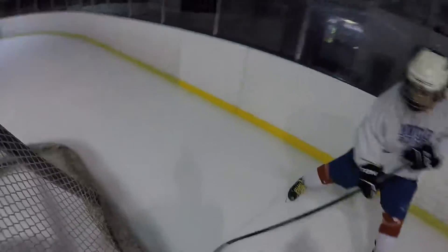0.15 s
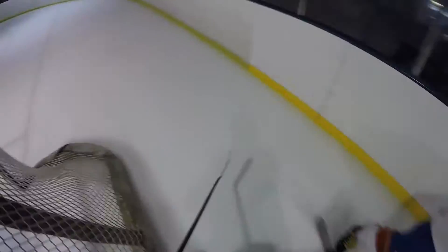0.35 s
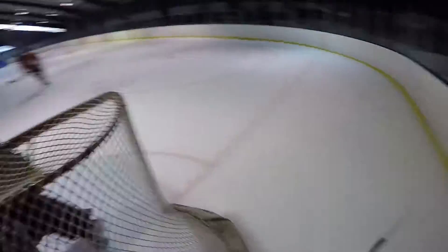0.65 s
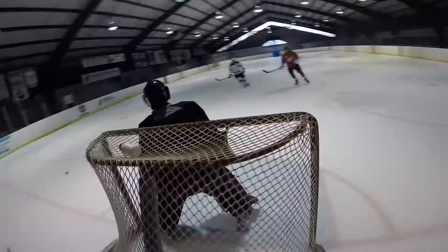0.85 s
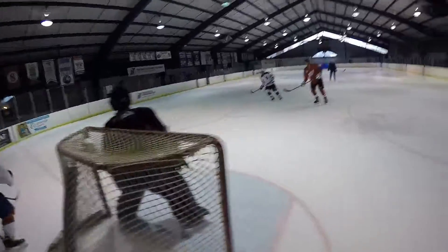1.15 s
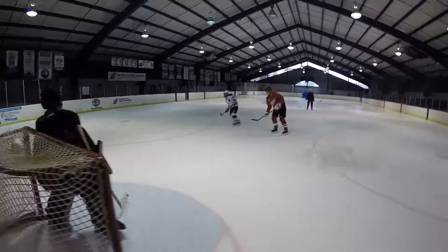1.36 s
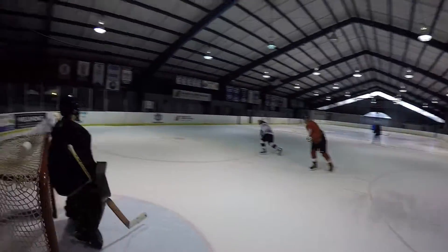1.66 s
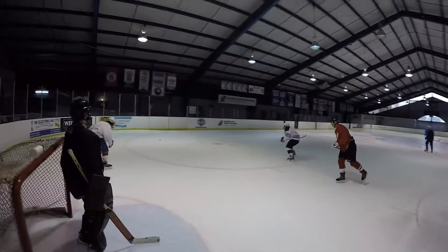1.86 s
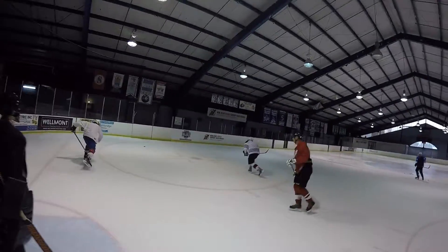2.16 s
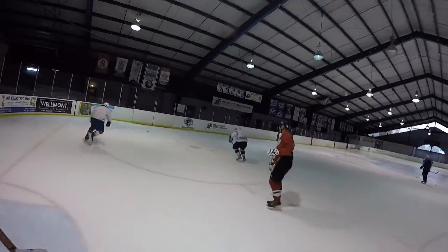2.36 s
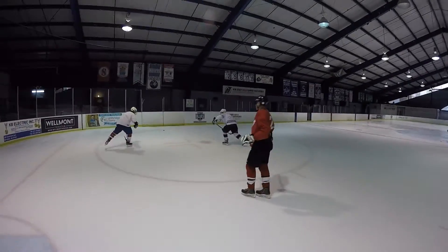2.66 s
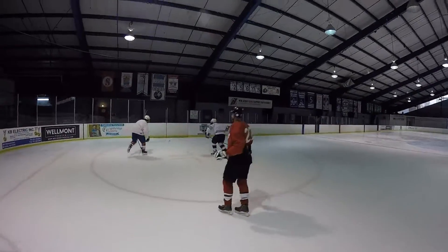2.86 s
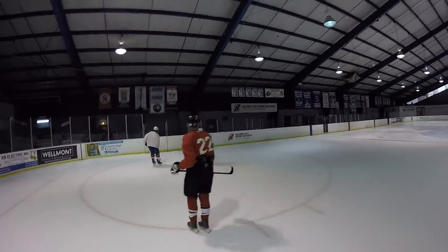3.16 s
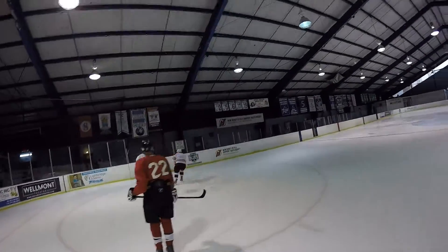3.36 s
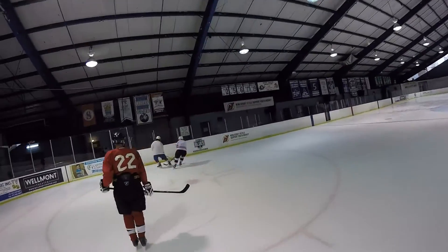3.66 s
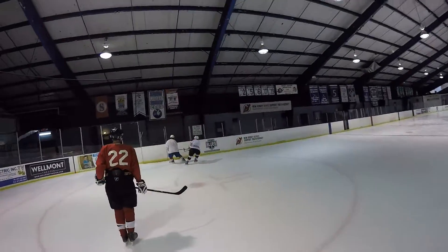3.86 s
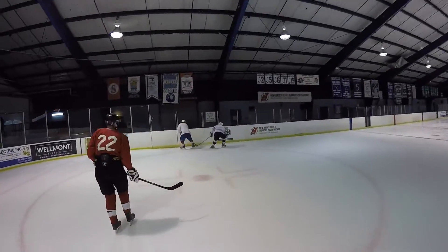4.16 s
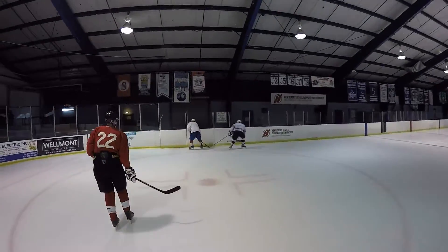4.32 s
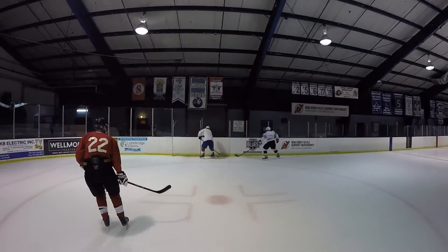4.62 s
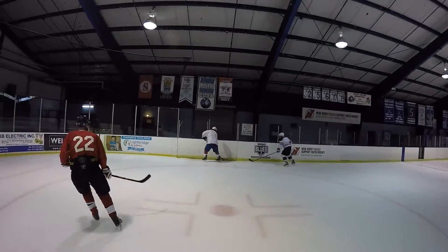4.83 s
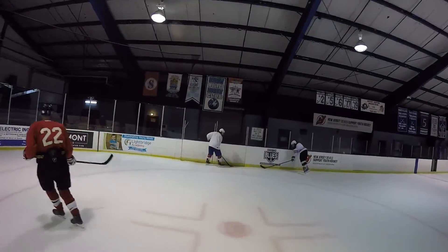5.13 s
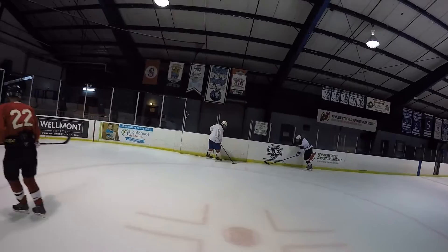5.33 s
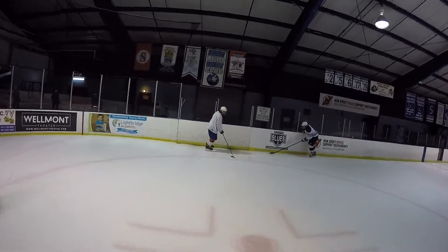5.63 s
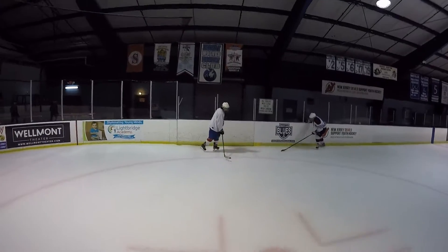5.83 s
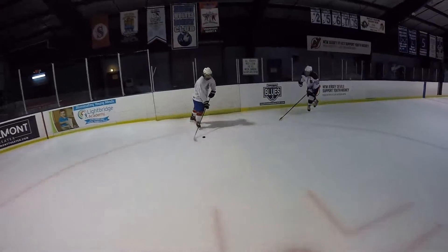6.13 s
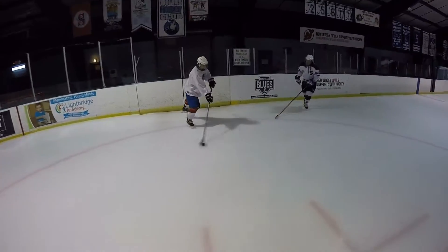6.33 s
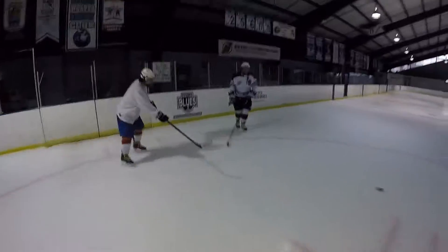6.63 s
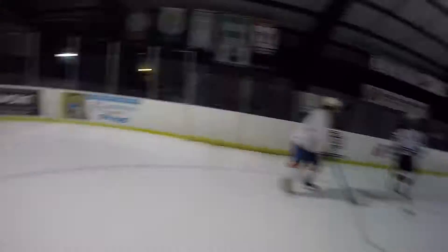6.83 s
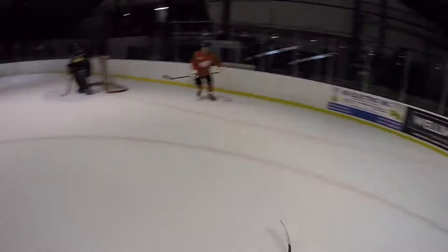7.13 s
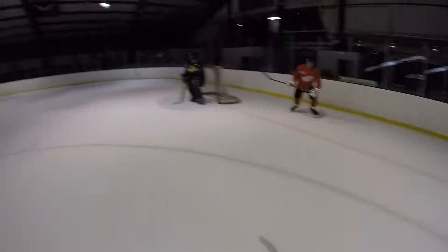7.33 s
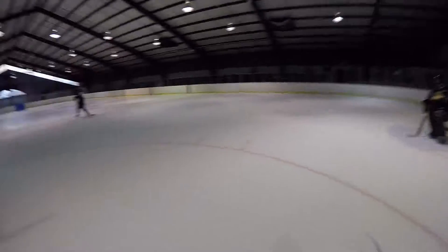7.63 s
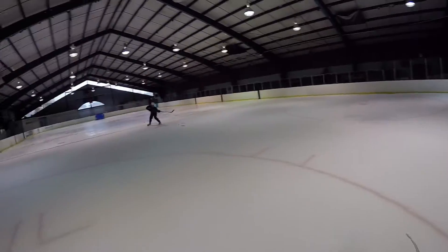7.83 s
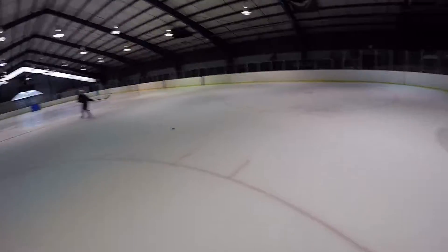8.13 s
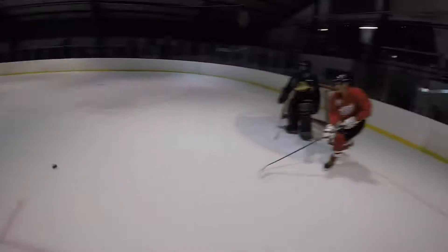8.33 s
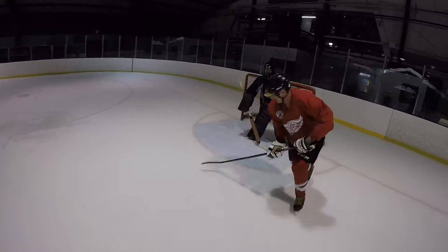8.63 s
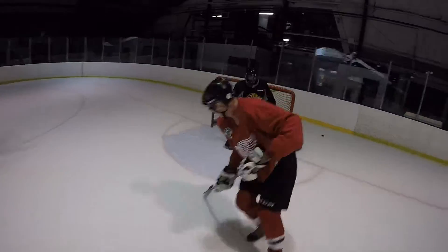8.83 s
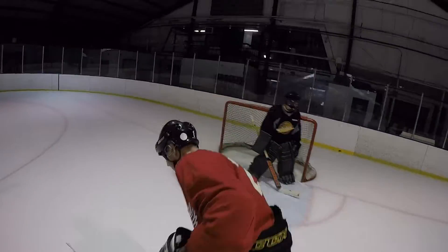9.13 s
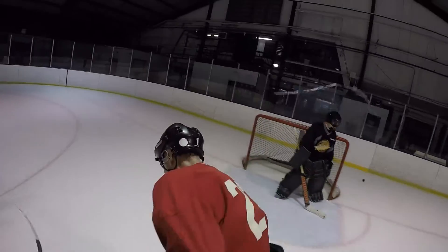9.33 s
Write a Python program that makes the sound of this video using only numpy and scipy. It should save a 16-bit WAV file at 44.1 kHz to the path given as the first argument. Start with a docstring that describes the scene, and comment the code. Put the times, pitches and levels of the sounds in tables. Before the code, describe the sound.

Close, gritty skate strokes hiss and scrape almost continuously, over low air buffeting and thumping camera shake. Stick and puck cracks come at the start, lightly in the middle, then in a hard burst near eight seconds, each echoing through the big indoor hall. Boards thud before five seconds; at nine a shot strikes the goal with a rough, low metallic shudder. Faint hiss and dull ticking lie beneath.

```python
"""Ice hockey in an indoor rink, heard at a camera on a skater's helmet: blades carve the ice and throw snow throughout.
A hard clack of stick and puck comes at once, skates step down from 1 to 3 s, and the boards thud near 4 s.
Air buffets the camera hardest at the start and at 7 s; hard clacks follow near 8 s, and at 9 s a shot rings the goal.
Shaped noise makes ice and air, struck resonances make the blows, and the hall answers every blow.
Faint hiss and regular low ticks lie beneath."""
import sys
import numpy as np
from scipy import signal
from scipy.fft import rfft, irfft, next_fast_len
from scipy.io import wavfile
from scipy.ndimage import uniform_filter1d, map_coordinates

SR = 44100
rng = np.random.default_rng(int(sys.argv[2]) if len(sys.argv) > 2 else 0)


def bounce(signal):
    """Save signal as a 16-bit WAV file at the path given by the first command-line argument."""
    frames = np.transpose(np.atleast_2d(signal))
    limited = np.clip(frames, -1, 1)
    pcm = np.round(limited * 32767).astype(np.int16)
    wavfile.write(sys.argv[1], SR, pcm)


N = 418068

# Air flow past the helmet as its wearer speeds up and turns:
# (time [s], buffet level [dB], mount shake level [dB])
AIR_FLOW = [(0.0, -28, -33), (0.22, -24.5, -19.5), (0.62, -36, -37.5), (1.02, -25.5, -30),
            (1.6, -38, -31.5), (1.95, -27.5, -37), (2.42, -41.5, -42), (3.05, -31.5, -42),
            (3.9, -34.5, -42.5), (5.25, -35.5, -39), (5.8, -43.5, -51), (6.25, -31.5, -41),
            (6.64, -37.5, -42.5), (6.97, -18, -20.5), (7.22, -23, -31.5), (7.55, -26, -35.5),
            (7.9, -39, -34.5), (8.25, -30, -48), (8.65, -38.5, -40.5), (9.0, -32, -31),
            (9.48, -28.5, -39.5)]
# Resonances of a stick blade: (centre [Hz], width [Hz], relative level [dB])
BLADE_MODES = [(1615, 126, 3), (2085, 520, -1), (2350, 99, 5)]


def amp(db):
    """Level is logarithmic: 20 dB is a factor of ten in amplitude."""
    return 10 ** (np.asarray(db) / 20)


def unit(x):
    """Normalization of the mean power: scale to rms 1."""
    return x / np.sqrt(np.mean(x ** 2) + 1e-20)


def along(points, hz):
    """Pitch is logarithmic: interpolate (frequency [Hz], value) points on a log axis."""
    f, v = np.transpose(points)
    return np.interp(np.log(hz + 1), np.log(f + 1), v)


def curves(rows):
    """Linear interpolation in time: one value per sample for each column after the time."""
    s, *columns = np.transpose(rows)
    return [np.interp(np.arange(N) / SR, s, column) for column in columns]


def wobble(rate):
    """Band-limited fluctuation: a smooth curve through random knots, rate of them per second."""
    knots = rng.standard_normal(int(N * rate / SR) + 4)
    return map_coordinates(knots, [np.arange(N) * rate / SR])


def filtered(x, response):
    """Linear filtering: multiply the spectrum of x by a response of frequency."""
    m = next_fast_len(len(x) + 4096)  # the padding leaves room for ringing
    return irfft(rfft(x, m) * response(np.fft.rfftfreq(m, 1 / SR)), m)[:len(x)]


def coloured(x, spectrum):
    """Spectral shaping: x weighted by (frequency [Hz], level [dB]) points, at rms 1."""
    return unit(filtered(x, lambda hz: amp(along(spectrum, hz))))


def resonance(f, centre, width):
    """Damped harmonic oscillator: the response of one mode, with gain 1 at its centre."""
    return 1j * f * width / (centre * centre - f * f + 1j * f * width)


def struck(x, modes, detune=0.027, scatter_db=0.5):
    """Modal superposition: x excites resonances that differ a little with the place of the blow."""
    chance = rng.standard_normal((len(modes), 2))
    varied = []
    for (centre, width, db), (a, b) in zip(modes, chance):
        varied.append((centre * np.exp(detune * a), width, amp(db + scatter_db * b)))

    def response(f):
        """Modes of alternating sign add up, as at a point where neighbours move in opposition."""
        return sum((-1) ** k * gain * resonance(f, centre, width)
                   for k, (centre, width, gain) in enumerate(varied))

    return unit(filtered(x, response))


def softened(x, hz):
    """Low-pass limit of excitation: a contact of finite length cannot excite the highest treble."""
    return signal.sosfilt(signal.butter(N=4, Wn=min(hz, .45 * SR), fs=SR, output="sos"), x)


def add(track, s, sound):
    """Linear superposition: mix a sound into the track at s seconds."""
    place = track[max(0, round(s * SR)):][:len(sound)]
    place += sound[:len(place)]


def chips(rate, spread_db, hiss):
    """Brittle fracture as a Poisson process: random snaps of unequal size on a bed of hiss."""
    count = rng.poisson(rate / SR, N)
    size = amp(spread_db * np.minimum(rng.exponential(size=N), 3))
    snaps = unit(count * size * rng.choice([-1, 1], N))
    return unit(snaps + hiss * rng.standard_normal(N))


def patchy(x, depth_db):
    """Time-varying filtering: the colour keeps shifting as the blade's edge and angle change."""
    z = signal.stft(x, nperseg=512)[2]
    across_bands = uniform_filter1d(rng.standard_normal(z.shape), size=5, axis=0)
    field = uniform_filter1d(across_bands, size=10, axis=1)
    return signal.istft(z * amp(depth_db * unit(field)), nperseg=512)[1][:N]


def skates(carving, spraying, scraping):
    """Friction noise of fracture: edges shave the ice and chatter, deep cuts growl, loose snow fizzes."""
    # Spectra of shaved ice, loose snow and deep cuts: (frequency [Hz], relative level [dB])
    carve_spectrum = [(700, -42), (1380, -7.5), (1480, -7.5), (1620, 2.5), (1900, 2), (2100, -2), (2400, 1),
                      (2900, -2.5), (3500, -9), (3950, -5), (4400, -18.5), (5500, -26.5), (8000, -35),
                      (15000, -64)]
    spray_spectrum = [(2500, -1.5), (4800, 14), (6300, 3), (7700, 2.5), (8600, -2), (9600, 2.5),
                      (11200, -9.5), (13000, -7), (15500, -16)]
    scrape_spectrum = [(100, 10), (200, -5.5), (350, -5.5), (600, -4), (760, -1.5), (1020, 1.5),
                       (1300, 4.5), (1700, -31), (3000, -44.5)]
    chatter_db = 0.58 * wobble(25) + 0.62 * wobble(110)
    carve = coloured(patchy(chips(rate=2500, spread_db=4.0, hiss=1.64), depth_db=1.37), carve_spectrum)
    spray = coloured(patchy(chips(rate=4000, spread_db=3.0, hiss=0.91), depth_db=3.4), spray_spectrum)
    scrape = coloured(patchy(chips(rate=900, spread_db=2.5, hiss=1.6), depth_db=0.5), scrape_spectrum)
    shaved = amp(-3.5) * carving * carve
    snow = amp(-4.0) * spraying * spray
    return amp(chatter_db) * (shaved + snow) + scraping * scrape


def skating():
    """Incoherent sources add in power: strokes lie on top of a glide that grows with the air flow."""
    # Skate strokes: (time of full pressure [s], rise [s], hold [s], fade [dB/s], carving level [dB],
    # snow spray relative to carving [dB], deep scrape relative to carving [dB])
    stroke_rows = [(0.02, 0.13, 0.016, 40, -36, -2.5, -17), (0.19, 0.25, 0.18, 54, -23.5, -6, -27),
                   (0.861, 0.42, 0.049, 16, -34.5, -23, -12), (1.17, 0.078, 0.046, 8.5, -35, -16, -9.5),
                   (1.43, .05, 0.12, 8.1, -39, -28, -9), (2.58, 0.16, .05, 11.6, -37.5, -14.5, -17.5),
                   (3.08, 0.045, .03, 63, -46, -8, -5), (3.761, 0.22, 0.055, 18, -37, -9, -11.5),
                   (3.95, 0.24, 0.04, 10.5, -26, -16, -17.5), (4.21, .06, .04, 10.7, -28.5, -19.5, -15),
                   (4.52, 0.24, 0.033, 7.3, -35, -8, -14), (4.82, 0.26, 0.036, 25, -29.5, -14.5, -28),
                   (6.12, 0.28, 0.019, 160, -38.5, -14.5, -19), (6.441, 0.23, 0.041, 20, -34, -16, -9),
                   (6.79, 0.27, 0.027, 24, -28, -15.5, -8.5), (7.499, 0.46, 0.035, 130, -35, -16.5, -5.5),
                   (7.79, 0.41, .15, 9.5, -27, -18, -15.5), (8.27, .12, .03, 11, -36.5, -12, -30),
                   (8.68, 0.4, 0.019, 35, -58.5, 11.5, -23), (8.96, 0.17, 0.032, 17, -44.5, 3, -16),
                   (9.07, 0.1, 0.084, 27, -27.5, -24, -26), (9.42, 0.33, .05, 14, -32.5, -30, -4)]
    spray_fades = 2.56  # snow settles this many times faster than the carving fades
    # the wearer's own glide at the mean of the flow curve, in dB, and its dB per dB of flow
    glide_db, glide_spray_db, glide_scrape_db, glide_grows = -43, -59.5, -51.5, 0.59
    _, flow_db = curves(AIR_FLOW)  # the mount shake stands for the flow
    glide = amp(glide_grows * (flow_db - flow_db.mean()))
    carve, spray, scrape = [(amp(db) * glide) ** 2 for db in (glide_db, glide_spray_db, glide_scrape_db)]
    for s, rise, hold, fade, db, spray_db, scrape_db in stroke_rows:
        pressure = amp(db) * stroke(s, rise, hold, fade)
        carve += pressure ** 2
        scrape += (amp(scrape_db) * pressure) ** 2
        spray += (amp(db + spray_db) * stroke(s, rise, hold, spray_fades * fade)) ** 2
    return np.sqrt([carve, spray, scrape])


def stroke(s, rise, hold, fade):
    """Exponential decay after loading: edge pressure builds and holds, then fades by fade dB a second."""
    t = np.arange(N) / SR - s
    build = np.clip(1 + t / max(rise, .01), 0, 1) ** 2
    return build * amp(-abs(fade) * np.maximum(t - hold, 0))


def clacks():
    """Impact and rebound: stick and puck meet twice in quick succession; a skate lands only once."""
    # Sticks and puck meeting: (time [s], relative level [dB], rebound delay [s],
    # shaft knock [dB], snap [dB], strongest ring [Hz])
    contacts = [(0.1001, -14, .007, -16, -6.5, 1750), (0.2855, -0.5, 0.0047, -29, -6.5, 2083),
                (0.951, -16.5, .003, -17, -15, 2030), (0.9575, -13, 0.0038, -25, -31, 1560),
                (0.9982, -21, 0.0081, -32, -15, 2520), (1.708, -23.5, .003, -35, -14, 1610),
                (2.7236, -27.5, 0.0022, -21, -7.5, 2560), (3.3316, -29.5, 0.0021, -16, -26.5, 1880),
                (3.557, -31, .009, -23, -5, 2470), (3.915, -14.5, 0.021, -22, -7, 2150),
                (4.1607, -16.5, 0.019, -16.5, -2, 1770), (4.7054, -14.5, .019, -24, -7.5, 2490),
                (5.9918, -35, 0.00194, -14, -6, 1580), (6.2251, -22, .002, -34, -15, 2140),
                (6.327, -18.5, 0.0038, -32, -10.5, 2560), (6.3749, -13.5, .015, -15, -2, 1630),
                (7.0906, -15, 0.00196, -20, -10.5, 2240), (7.2573, -23, 0.0076, -29, -13, 2460),
                (7.3437, -23, .003, -29, -20, 1650), (7.3762, -26, .003, -20, -36, 1540),
                (7.7573, -5, 0.0021, -21, -5, 1707), (7.7865, -2.5, 0.012, -21.5, -13.5, 1885),
                (7.8335, -14, 0.0078, -37, -7, 1710), (7.9329, -11, 0.0048, -31, -20, 2040),
                (8.0155, -11.5, 0.00197, -23.5, -24, 1790), (9.0227, -10.5, 0.0068, -11, -2, 1810),
                (9.3183, -21, 0.0038, -19, -22, 2320)]
    # Skate blades set down on the ice: (time [s], relative level [dB])
    landings = [(1.1398, -23), (1.3943, -21), (2.08, -31.5), (2.548, -33.5), (3.0629, -37)]
    rebound_db = -4.5  # against the first blow
    crack_db = -17  # offset from the snap setting: both grow with the hardness of the blow
    track = np.zeros(N)
    for s, db, rebound, knock_db, snap_db, hz in contacts:
        for delay, loss_db in [(0, 0), (rebound, rebound_db)]:
            blow = clack(knock_db, snap_db, snap_db + crack_db, hz, t60=0.035)
            add(track, s + delay, amp(db + loss_db) * blow)
    for s, db in landings:
        add(track, s, amp(db) * clack(knock_db=-19, snap_db=-8, crack_db=-13, hz=1590, t60=0.1))
    return filtered(track, lambda f: (1j * f / (330 + 1j * f)) ** 2)  # thin sticks radiate little bass


def clack(knock_db, snap_db, crack_db, hz, t60):
    """Impulsive modal excitation: a chattering contact rings blade and shaft and cracks the ice."""
    # Resonances of shaft and puck, and of the snap: (centre [Hz], width [Hz], relative level [dB])
    shaft_modes = [(517, 1100, -8), (640, 15, -25), (1080, 210, 10.5)]
    snap_modes = [(2827, 174, 3.5), (3220, 350, -3.5), (3980, 190, -1.5), (4860, 710, -20)]
    # Spectrum of the ice crack: (frequency [Hz], relative level [dB])
    crack_spectrum = [(1000, -1), (3500, -4.5), (5200, 5.5), (6500, 2), (8500, -7.5), (9800, -6),
                      (11500, -25), (15500, -21)]
    t = np.arange(SR // 10) / SR
    contact = rng.standard_normal(len(t)) * amp(-60 * t / max(t60, .004))
    contact[0] += 6.5  # the first blow stands out of the chatter
    brief = contact * amp(-60 * t / 0.13)  # high modes get a faster-fading contact
    tone = struck(contact, [(hz, 65, 0)], detune=0.0058)  # the place of the blow favours one resonance
    blade = amp(-1.5) * struck(contact, BLADE_MODES)
    shaft = amp(knock_db + 9.0) * struck(contact, shaft_modes)
    body = blade + amp(-2.5) * tone + shaft
    snap = amp(snap_db + 5.5) * struck(brief, snap_modes)
    crack = amp(crack_db + 4.5) * coloured(brief, crack_spectrum)
    return amp(-20.0) * (softened(body, hz=3700) + softened(snap, hz=4960) + crack)


def scuffs():
    """Stick-slip friction: an edge or stick bites and lets go in a ragged burst of chips in one broad band."""
    # Short crunching drags: (time [s], level [dB], length, at least 0.005 [s], centre [Hz])
    drags = [(0.109, -33.5, 0.29, 1710), (0.276, -22, 0.015, 2930), (0.283, -22, .005, 8900),
             (3.68, -40.5, 0.54, 3260), (6.342, -35.5, 0.033, 2200), (6.636, -40.5, 0.26, 3430),
             (6.677, -58, 0.26, 7400), (6.959, -32.5, 0.045, 1800), (7.025, -33, 0.036, 1750),
             (7.282, -34, .025, 2900), (7.286, -53, 0.021, 7440), (7.32, -57, 0.019, 8500),
             (7.755, -31, 0.002, 9050), (7.775, -39, 0.0094, 5700), (8.051, -37.5, 0.34, 1940),
             (9.054, -19.5, 0.028, 3210), (9.058, -21.5, 0.019, 2060), (9.06, -45, 0.014, 8300),
             (9.079, -23.5, 0.015, 2740), (9.114, -24, 0.016, 3280), (9.165, -28.5, 0.02, 2960)]
    track = np.zeros(N)
    for s, db, length, hz in drags:
        swell = np.hanning(round(max(length, .005) * SR)) ** 0.35
        grit = chips(rate=1500, spread_db=-1.0, hiss=0.35)[:len(swell)] * swell
        band = filtered(grit, lambda f: resonance(f, hz, hz / 2) ** 3)
        add(track, s, amp(db) * unit(band))
    return track


def taps(carving, rate=7, spread_db=5):
    """Poisson impacts, rate per second: dull taps of skates and sticks, louder where skating is harder."""
    blows = rng.poisson(rate / SR, N) * np.sqrt(carving) * amp(spread_db * rng.random(N))
    return amp(-51.5) * softened(struck(blows, BLADE_MODES), hz=2790)


def boards():
    """Damped panel resonance: blows make the wall panels rattle around one resonance each."""
    # Blows of puck, sticks and bodies: (time [s], starting level [dB], panel resonance [Hz], t60 [s])
    thuds = [(3.706, -47.5, 533, 0.43), (3.775, -45, 620, 0.18), (4.706, -21, 1050, 0.047),
             (4.798, -35, 900, 0.067), (4.864, -38.5, 980, .07), (7.797, -23, 1170, 0.084),
             (9.022, -26, 463, 0.083)]
    track, t = np.zeros(N), np.arange(SR) / SR
    for s, db, hz, t60 in thuds:
        rattle = unit(filtered(rng.standard_normal(SR), lambda f: resonance(f, hz, 0.24 * hz) ** 2))
        add(track, s, amp(db - 60 * t / max(t60, .01)) * rattle)
    return track


def goal(t60=0.37):
    """Decaying modal vibration: steel frame and net shudder after the shot, ringing low and roughly."""
    # The shot on the frame: (time [s], starting level [dB])
    post_hit = (9.023, -25)
    # Ringing of the frame: (centre [Hz], width [Hz], relative level [dB])
    frame_modes = [(207, 16, 0.5), (323, 49, -10.5), (467, 43, -28), (680, 100, -6)]
    track, t = np.zeros(N), np.arange(SR) / SR
    s, db = post_hit
    shudder = struck(rng.standard_normal(SR), frame_modes, detune=0, scatter_db=0)
    add(track, s, amp(db - 60 * t / t60) * shudder)
    return track


def hall(x, build=0.0056):
    """Diffuse reverberation: noise builds as sound returns from boards and roof; the middle rings longest."""
    # Reverberation time of the hall: (frequency [Hz], t60 [s])
    reverberation = [(150, 1.4), (1000, 3.5), (2200, 2.26), (4000, 2.2), (8000, 1.9), (15000, 1.56)]
    hz, t, z = signal.stft(rng.standard_normal(2 * SR), SR, nperseg=256)
    decay = amp(-60 * t / along(reverberation, hz)[:, None])
    onset = 1 - np.exp(-t / build)  # build is a time constant in seconds
    tail = signal.istft(z * decay * onset, SR, nperseg=256)[1]
    return signal.fftconvolve(x, tail / np.linalg.norm(tail))[:N]


def air():
    """Turbulent pressure and forced vibration: air buffets and flutters; air and jolts shake the mount."""
    # Spectra of buffeting, mount resonance and flutter round the case: (frequency [Hz], relative level [dB])
    buffet_spectrum = [(8, -6), (18, 2.5), (26, 7), (45, -6), (62, -11), (100, -34), (200, -41), (500, -59),
                       (1200, -120)]
    mount_spectrum = [(40, -51), (68, -7), (90, 7), (112, -6.5), (130, -17.5), (160, -27), (200, -45),
                      (400, -61), (1000, -120)]
    flutter_spectrum = [(60, -25), (125, 8.5), (165, -7.5), (220, -18), (350, -34), (600, -15), (1200, -70)]
    # Jolts of the head that shake the mount: (time [s], peak shake level [dB])
    head_jolts = [(0.39, -15.5), (0.6, -24), (0.75, -29.5), (1.59, -17), (1.76, -26), (2.5, -31.5),
                  (7.07, -14.5), (7.521, -21), (8.98, -24.5), (9.261, -25.5)]
    jolt_s = 0.038  # from a jolt's peak to 1/e of it
    flutter_db, flutter_grows = -32, 1.54  # level at the strongest shake; dB per dB of the shake curve
    buffet_db, shake_db = curves(AIR_FLOW)
    t = np.arange(N) / SR
    jolts = sum(amp(db) * np.exp(-((t - s) / jolt_s) ** 2) for s, db in head_jolts)
    shaking = np.hypot(amp(shake_db + 3.4 * wobble(13)), jolts)
    buffet = amp(buffet_db + 2.24 * wobble(9)) * rumble(buffet_spectrum, steady=0.84)
    flutter_level = amp(flutter_db + flutter_grows * (shake_db - shake_db.max()))
    flutter = flutter_level * rumble(flutter_spectrum, steady=0.3)
    return buffet + shaking * rumble(mount_spectrum, steady=0.55) + flutter


def rumble(spectrum, steady):
    """Turbulence as shaped noise: dividing by a power of its short-time power partly evens the swells."""
    x = coloured(rng.standard_normal(N), spectrum)
    power = np.abs(uniform_filter1d(x * x, size=4000)) + 1e-6
    return unit(x / power ** (steady / 2))


def ticking():
    """Periodic impulses through a broad resonance: dull, evenly spaced ticks, like electronic interference."""
    start_s, period_s, peak_db, centre_hz = 0.038, 0.1024, -47.5, 184
    pulses = np.zeros(N)
    pulses[(np.arange(start_s, N / SR, period_s) * SR).astype(int)] = 1
    ticks = filtered(pulses, lambda f: resonance(f, centre_hz, centre_hz) ** 2)
    return amp(peak_db) * ticks / np.abs(ticks).max()


def scene():
    """Superposition of direct and reverberant sound: skates, blows with their hall echo, and air."""
    carving, spraying, scraping = skating()
    blows = clacks() + scuffs() + taps(carving) + boards() + goal()
    scattered = blows * (0.66 + 0.73 * wobble(450))  # each direction has its own colour, so the rings blur
    echo = hall(softened(scattered, hz=7700))  # the long way through the air takes off the treble
    return (skates(carving, spraying, scraping) + blows + amp(-6.0) * echo + air())[None]


def record(dry):
    """Resonant colouring and saturation: the case rings, hiss and ticks join, peaks round, the band ends."""
    # Resonances of the camera's case: (centre [Hz], width [Hz], level against the direct sound [dB])
    case_modes = [(1534, 110, -16), (3060, 34, -40), (3840, 37, -20), (4750, 120, -5), (5550, 120, -6.5),
                  (5760, 100, -9), (6620, 120, -3.5), (7530, 100, -1)]
    x = filtered(dry[0], lambda f: 1 + sum(amp(db) * resonance(f, c, w) for c, w, db in case_modes))
    x = x + amp(-67.5) * rng.standard_normal(N) + ticking()
    rounded = x / (1 + np.abs(x) ** 8) ** (1 / 8)
    return filtered(rounded, lambda hz: hz < 15500)[None]


dry = scene()
out = record(dry)
bounce(out)
```